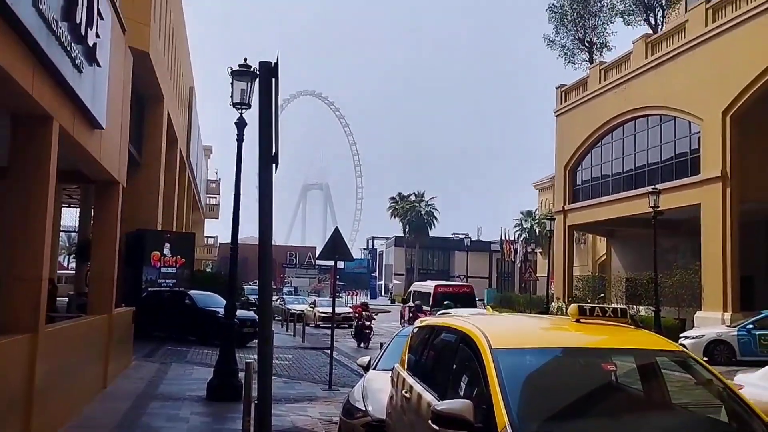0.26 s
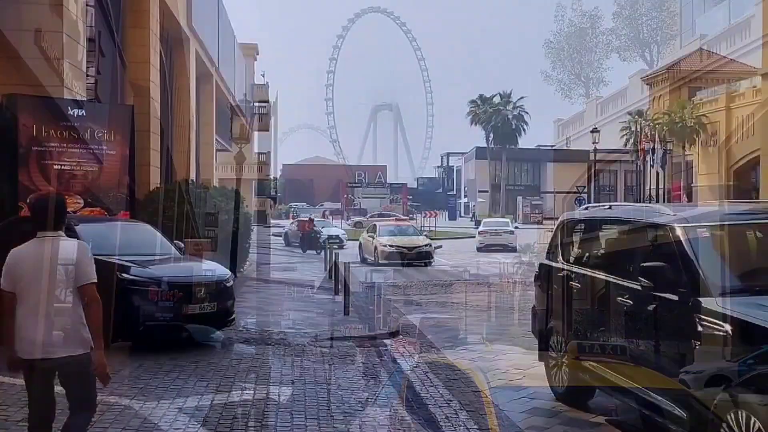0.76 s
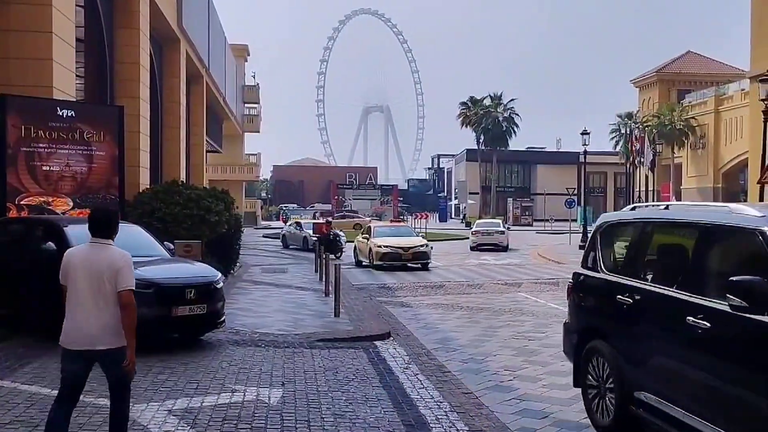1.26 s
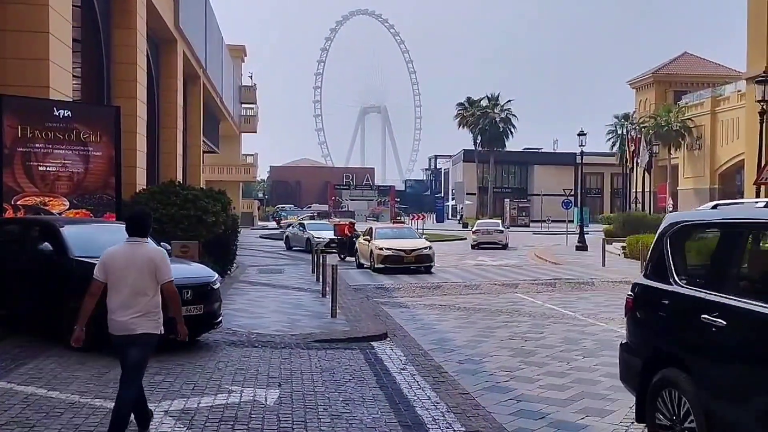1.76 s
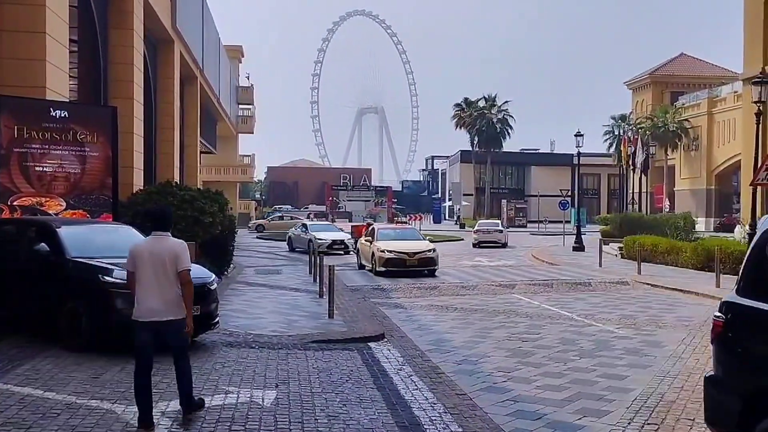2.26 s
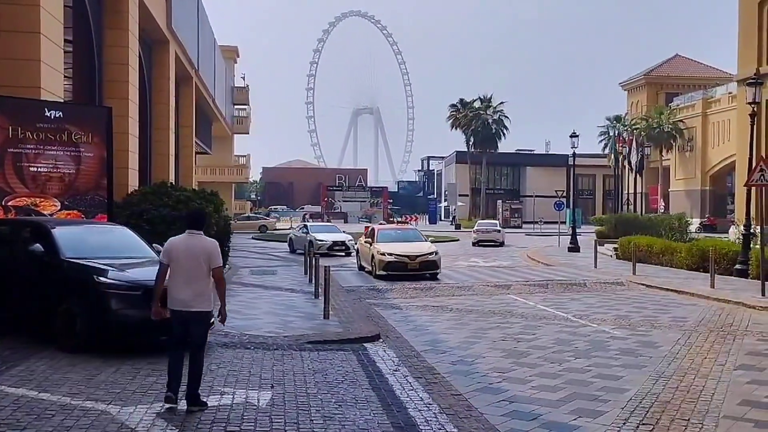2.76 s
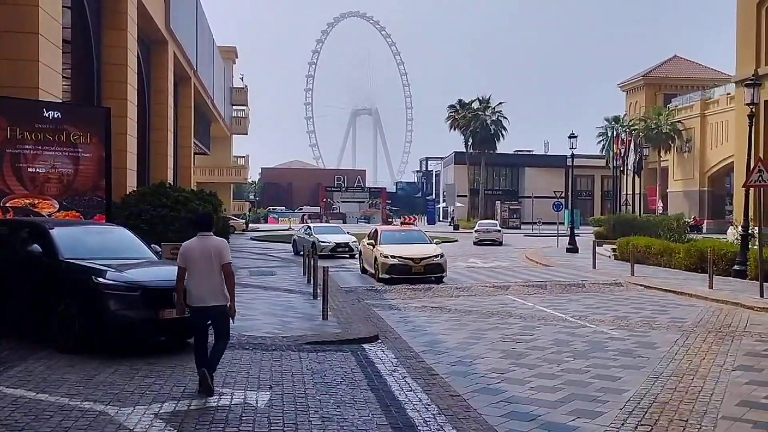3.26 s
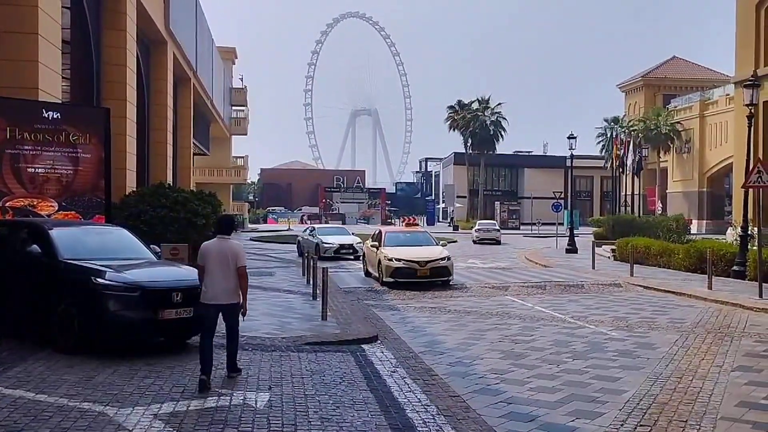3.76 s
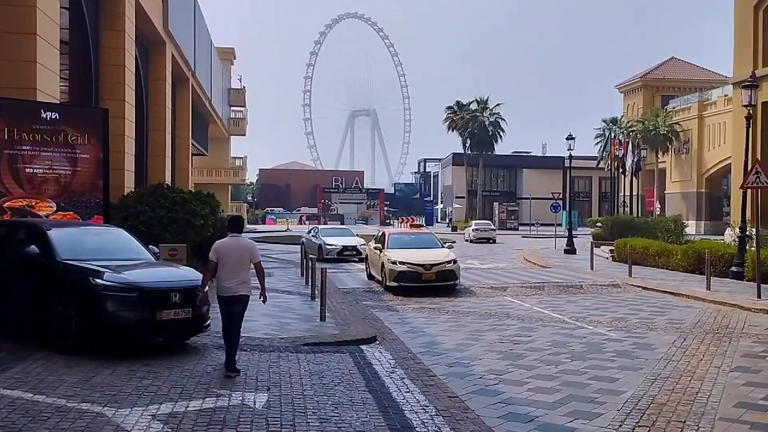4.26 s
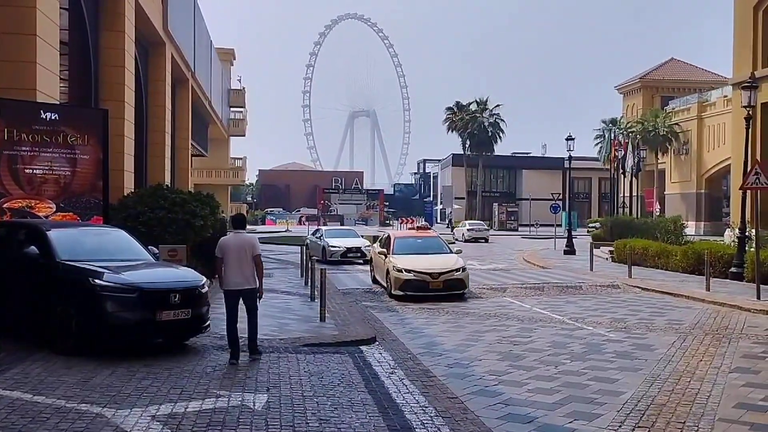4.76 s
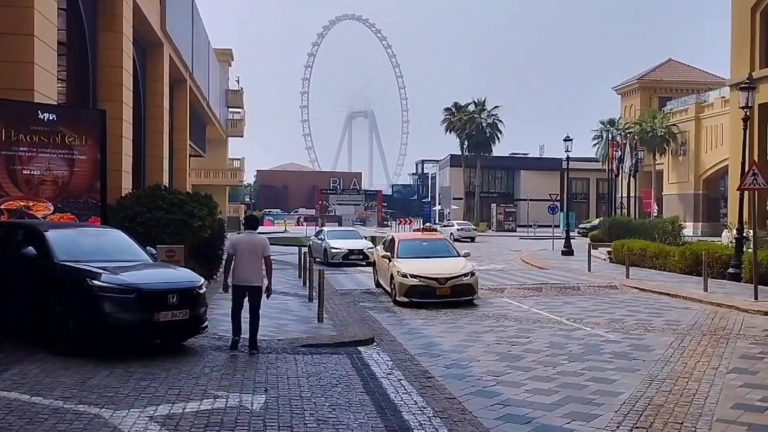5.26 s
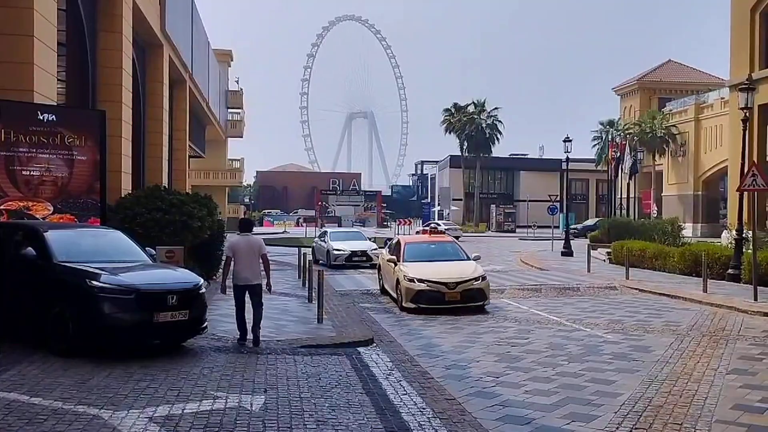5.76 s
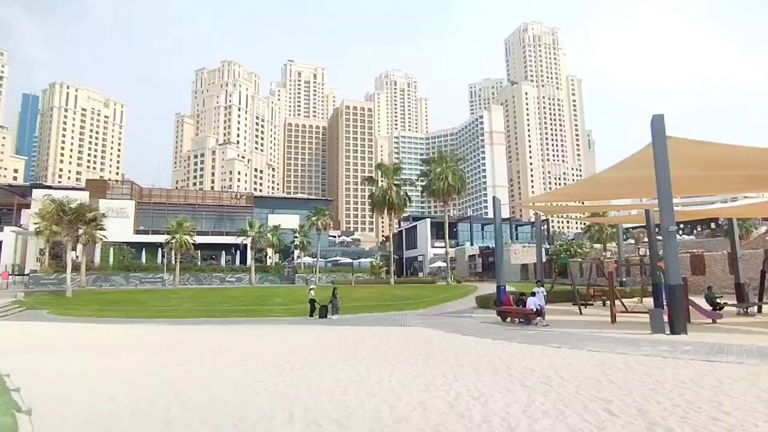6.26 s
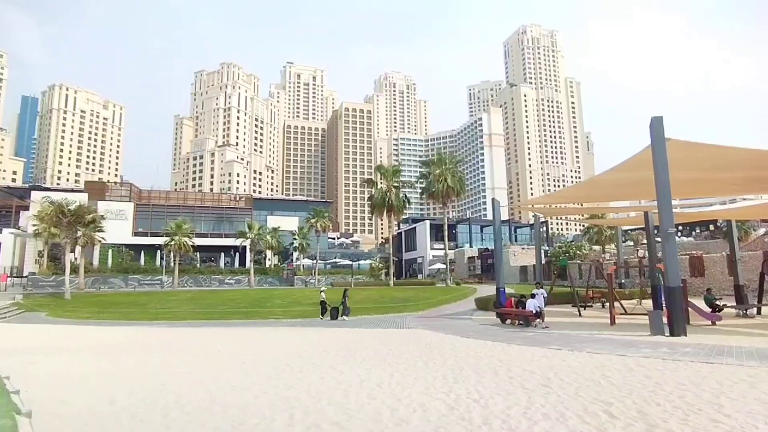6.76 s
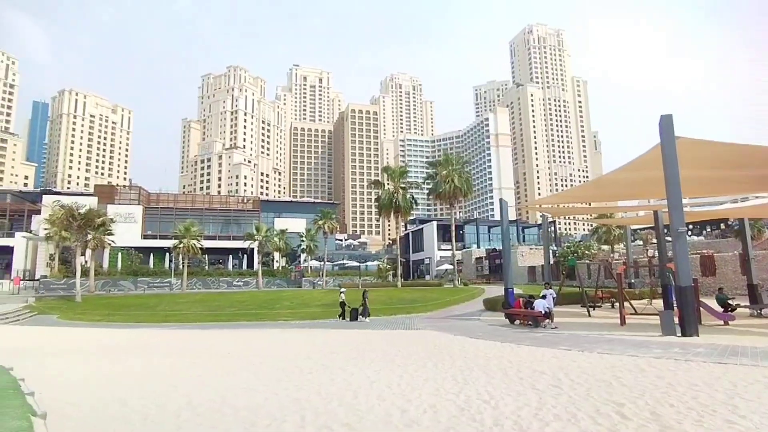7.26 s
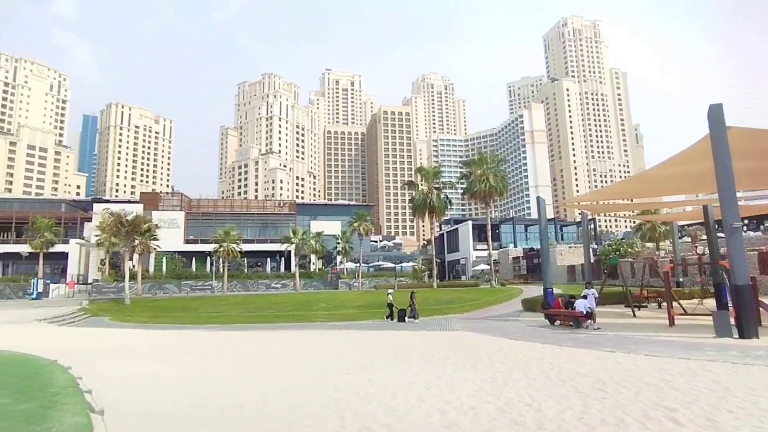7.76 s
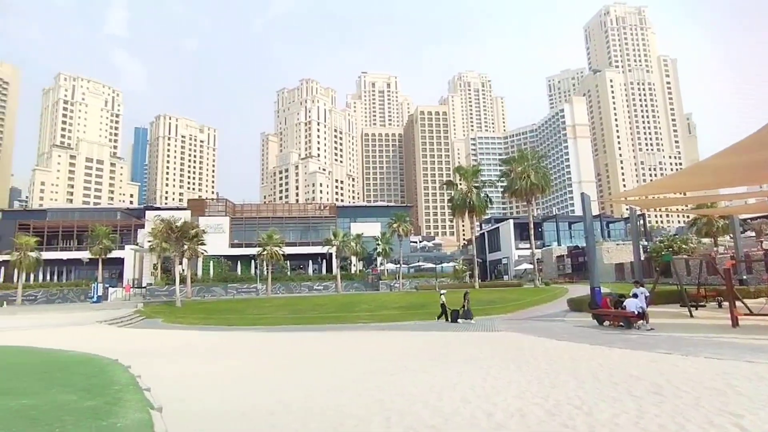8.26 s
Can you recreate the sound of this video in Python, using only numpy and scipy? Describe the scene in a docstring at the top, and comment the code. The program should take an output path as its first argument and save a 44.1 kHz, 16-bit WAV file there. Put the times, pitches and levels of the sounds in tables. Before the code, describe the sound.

Cars roll slowly along a paved street, engines humming and throbbing while tyres hiss. Sparrows chirp now and then, and a rubbing brake gives short, high squeals. The street stops dead, and after a blink of silence a quieter beach swells in: distant traffic, humming machinery, a breeze, tiny crackles of sand and a faint high trill. Puffs of wind bump the stereo microphones in both places.

```python
"""Cobbled street, then beach front

Slow traffic: engines hum and throb, tyres hiss on the paving, a rubbing brake disc sings, sparrows chirp.
After a short silence, a quieter beach: far traffic, humming machinery, a breeze, crackling sand and a
thin high trill. Wind puffs strike the two microphones, a hand's length apart, in both places.
Road, wind and sand are shaped noise; machines and birds are wavering sines."""
import sys
import numpy as np
from scipy import signal
from scipy.fft import rfft, irfft, next_fast_len
from scipy.io import wavfile
from scipy.ndimage import uniform_filter1d, map_coordinates

SR = 44100
rng = np.random.default_rng(int(sys.argv[2]) if len(sys.argv) > 2 else 0)


def generate_wav(signal):
    """Clip the signal to [-1, 1] and save it as 16-bit WAV at the path in sys.argv[1]."""
    frames = np.transpose(np.atleast_2d(signal))
    scaled = np.clip(frames, -1, 1) * 32767
    pcm = np.round(scaled).astype(np.int16)
    wavfile.write(sys.argv[1], SR, pcm)


N = 375732
STREET_END_S, BEACH_START_S = 6.094, 6.234

# Stereo lean by band. Each row: frequency in Hz, left minus right in dB.
STREET_PAN = [(60, -1.5), (400, 0), (800, -.5), (1400, 1.5), (2000, 0), (2600, -6), (4000, -7),
              (5200, -3.5), (6500, 0), (8000, 0.5), (9500, 10), (11000, 12.5), (13000, 8.5), (16000, 5.5)]
BEACH_PAN = [(100, -0.5), (400, 2.5), (1300, -4), (2400, -4), (4400, -8.5), (6500, -8), (8200, 2),
             (10000, 2), (12500, 12.5), (16000, 2)]
CRUNCH_PAN = [(1000, -1), (4500, -2)]
# Spectrum of crunching sand. Each row: frequency in Hz, relative density in dB.
CRUNCH_SPECTRUM = [(700, -26), (1500, -4), (2500, 1), (3600, -6), (4600, -13), (6500, -47)]


def amp(db):
    """Decibels to gain."""
    return 10 ** (np.asarray(db) / 20)


def unit(x):
    """x at rms 1."""
    return x / np.sqrt(np.mean(x ** 2) + 1e-20)


def clock():
    """Sample times in seconds."""
    return np.arange(N) / SR


def spell(start_s, end_s, attack_s, release_s):
    """Envelope, 0 to 1: rises before the start, holds, falls after the end."""
    t = clock()
    return np.clip(1 + np.minimum((t - start_s) / attack_s, (end_s - t) / release_s), 0, 1)


def along(points, hz):
    """Interpolate (Hz, value) points on a log frequency axis."""
    knots_hz, values = np.transpose(points)
    return np.interp(np.log(hz + 1), np.log(knots_hz + 1), values)


def wobble(rate_hz):
    """Smooth random curve, rate_hz knots a second."""
    knots = rng.standard_normal(int(N * rate_hz / SR) + 4)
    return map_coordinates(knots, [clock() * rate_hz])


def filtered(x, response):
    """Filter x by response(hz)."""
    size = next_fast_len(N + 8192)
    return irfft(rfft(x, size) * response(np.fft.rfftfreq(size, 1 / SR)), size)[..., :N]


def sides(pan_db):
    """Stereo gains for a left minus right level."""
    return amp(np.array([[.5], [-.5]]) * pan_db)


def placed(pair, spectrum, pan):
    """Colour and pan a stereo pair by band; its centre has rms 1."""
    out = filtered(pair, lambda hz: amp(along(spectrum, hz)) * sides(along(pan, hz)))
    return out / np.std(out.mean(0))


def rush(spectrum, pan, alike, patchy_db=1.0):
    """Diffuse noise at two spaced microphones, patchy in time and frequency."""
    # The pair agrees in the bass and opposes where half a wave fits between.
    # Each row: frequency in Hz, correlation.
    coherence = [(60, 1), (300, 0.96), (520, 0.72), (750, 0.8), (1000, 0.41), (1200, 0.11), (1450, -0.52),
                 (1850, -0.54), (2150, 0.02), (2800, -0.046), (3200, -0.11), (4000, 0.018), (16000, 0.1)]

    def mid_side_gains(hz):
        likeness = np.clip(alike * along(coherence, hz), -1, 1)
        return np.sqrt([1 + likeness, 1 - likeness])

    bins = signal.stft(rng.standard_normal((2, N)), nperseg=512)[2]
    patches = uniform_filter1d(rng.standard_normal(bins.shape[1:]), size=7, axis=0)
    patches = unit(uniform_filter1d(patches, size=16, axis=1))
    pair = signal.istft(bins * amp(patchy_db * patches), nperseg=512)[1][:, :N]
    mid, side = filtered(pair, mid_side_gains)
    return placed(np.array([mid + side, mid - side]), spectrum, pan)


def from_right(spectrum, lag_s=.00035):
    """Direct road noise: reaches the left microphone lag_s late."""
    delay_s = lag_s * np.array([[.5], [-.5]])
    pair = filtered(rng.standard_normal(N), lambda hz: np.exp(-2j * np.pi * hz * delay_s))
    return placed(pair, spectrum, STREET_PAN)


def tone(hz, drift, rate_hz, flutter_db):
    """Sine of rms 1 wavering in level and pitch; drift is a fraction of the pitch."""
    phase = 2 * np.pi * np.cumsum(hz * (1 + drift * wobble(rate_hz))) / SR
    return unit(np.sin(phase + rng.uniform(0, 2 * np.pi)) * amp(flutter_db * wobble(rate_hz)))


def draught():
    """Air moving down the street buffets the microphones."""
    # Each row: frequency in Hz, relative density in dB.
    spectrum = [(8, -22), (22, 3), (45, 4.5), (65, -8.5), (120, -13.5), (300, -50.5), (600, -100)]
    level_db = -32.5 + spell(3.4, 4.7, .4, .5) + 1.3 * wobble(12)
    return amp(level_db) * rush(spectrum, STREET_PAN, alike=.62)


def traffic(leftward_db_per_s=.9):
    """Cars roll past: engines rumble, the road roars, tyres hiss and drum on the paving."""
    # Each row: frequency in Hz, relative density in dB.
    rumble_spectrum = [(35, -14.5), (65, -2), (100, 0.5), (130, -2.5), (180, -4), (300, -6.5), (400, -13.5),
                       (600, -28), (1500, -85)]
    roar_spectrum = [(150, -36), (330, -5.5), (450, -0.5), (620, -5), (800, -4), (1000, -7.5), (1300, -11),
                     (1700, -11.5), (2400, -30.5), (6000, -78)]
    tyre_spectrum = [(900, -28), (1600, -2.5), (1900, 0), (2200, 0.5), (2700, -1), (3000, -2.5), (3600, -3),
                     (4500, -6.5), (5700, -11.5), (6500, -24), (7400, -34), (8100, -29), (10000, -52)]
    paving_spectrum = [(250, -29), (420, -16), (530, 4.5), (720, 0.5), (880, -2.5), (1100, -14),
                       (2000, -40)]
    fizz_spectrum = [(3500, -14), (5500, 5.5), (6400, 4), (7500, 1), (8150, -19.5), (8800, -5),
                     (9900, -4.5), (11100, -9.5), (12400, 0.5), (14000, -2), (16000, -3.5)]
    near_spectrum = [(600, -30), (1500, -9), (2000, 1), (2600, 2.5), (3300, -3.5), (4200, -6.5),
                     (5300, -16), (6600, -13), (8000, -27.5), (10000, -22), (11200, -37), (12500, -17),
                     (16000, -18)]
    # Each row: frequency in Hz, left minus right in dB.
    near_pan = [(1000, -8), (3000, -2.5), (6000, -20), (12500, -1)]
    rolling = spell(2.12, 4.1, 1.6, 1.24)
    near = spell(0, .21, .1, .66)  # a car creeps by on the right
    approach = spell(4.54, 5.4, .6, 1.0)  # another comes up the street
    rumble = amp(-27.5 + 1.47 * rolling + 2 * near) * rush(rumble_spectrum, STREET_PAN, alike=.96)
    roar_db = -36.5 + 2 * rolling + 1.5 * near
    roar = amp(roar_db) * rush(roar_spectrum, STREET_PAN, alike=.86, patchy_db=.73)
    tyre_echoes = rush(tyre_spectrum, STREET_PAN, alike=.96, patchy_db=.9)
    tyres = amp(-46.5 + 2.5 * rolling) * (tyre_echoes + amp(-6.5) * from_right(tyre_spectrum))
    paving = amp(-42.5) * approach * rush(paving_spectrum, STREET_PAN, alike=.9)
    leftward = sides(leftward_db_per_s * (clock() - STREET_END_S / 2))
    fizz = amp(-58.5 + 8.5 * rolling) * leftward * rush(fizz_spectrum, STREET_PAN, alike=.5)
    near_hiss = amp(-41.5) * near * rush(near_spectrum, near_pan, alike=.8, patchy_db=1.1)
    return rumble + roar + paving + tyres + fizz + near_hiss


def motors():
    """One engine idles, one pulls and slows, a heavy exhaust throbs; a near car and a cooling fan hum."""
    # Each row: time in seconds, firing rate in Hz, level in dB.
    pulling = [(0, 148, -47), (.6, 150, -39), (1.0, 152, -33.5), (1.55, 155.5, -32.5), (1.95, 155, -41),
               (2.35, 154, -32.5), (3.2, 150, -31), (3.9, 146.5, -34.5), (4.4, 145, -44), (4.95, 144, -34),
               (5.2, 143, -44.5), (5.5, 143, -35), (6.1, 142, -42.5)]
    throb = [(1.7, 41.8, -60), (2.2, 42.4, -30), (2.8, 43.1, -32.5), (3.3, 45, -35.5), (3.9, 41.95, -35),
             (4.2, 36.34, -33), (4.45, 34.8, -28), (4.8, 35, -55)]
    # Each row: time in seconds, level in dB.
    fan_levels = [(0, -50), (.65, -46), (.9, -42), (1.4, -36), (2, -38), (2.2, -41), (2.9, -37.5),
                  (3.4, -40), (3.6, -34.5), (4.25, -38), (4.6, -47), (5.3, -47), (6, -43)]
    # Weaker tones of idling cars. Each row: frequency in Hz, relative level in dB.
    overtones = [(226, -6.5), (270, -4), (303, -2.5), (347, -2), (458, -17.5), (506, -9.5), (541, -9),
                 (617, -11), (652, -11.5), (740, -10)]
    t = clock()
    idle_db = -40 + 9 * spell(2.4, 3.8, 1.9, 5.2)
    engines = amp(idle_db) * tone(69.5, drift=.02, rate_hz=9, flutter_db=1)
    for course in (pulling, throb):
        times_s, hz, db = np.transpose(course)
        firing = tone(np.interp(t, times_s, hz), drift=.0161, rate_hz=16, flutter_db=1.5)
        engines += amp(np.interp(t, times_s, db)) * firing
    near_hum = amp(-39) * spell(.051, .87, .1, .34) * tone(269, drift=.002, rate_hz=7, flutter_db=2.5)
    fan_db = np.interp(t, *np.transpose(fan_levels))
    fan = amp(fan_db) * tone(370, drift=.0025, rate_hz=9, flutter_db=1)
    load = spell(1.45, 4.27, .56, .4)
    weak_tones = sum(amp(db) * tone(hz, drift=.003, rate_hz=7, flutter_db=3.5) for hz, db in overtones)
    return (engines + near_hum + fan + amp(-46 + 5.5 * load) * weak_tones) * sides(-.5)


def gusts():
    """Brief puffs of wind, each stronger at one microphone."""
    # Each row: peak time in seconds, level in dB, left minus right in dB, half-length in seconds.
    puffs = [(0.166, -26.5, 13, 0.1), (0.42, -22.5, 2, 0.053), (0.555, -27, 13, 0.05),
             (0.774, -29, 22, 0.026), (6.397, -30, -10, 0.023), (6.47, -31, -11, .022),
             (6.82, -33, -10, 0.024), (6.936, -31, -14, 0.03), (7.043, -28.5, -12, 0.03),
             (7.112, -29, -9, 0.031), (7.19, -23.5, -4, 0.03), (7.374, -28, -19, 0.021),
             (7.439, -30, -11, 0.021), (7.695, -32.5, -5, 0.02), (8.04, -31, 1, .022), (8.46, -38, 4, .022)]
    # Each row: frequency in Hz, relative density in dB.
    spectrum = [(8, -9), (20, 5), (60, 3.5), (110, -4.5), (200, -13), (320, -24.5), (600, -45), (1200, -87)]
    force = sum(amp(db) * sides(pan_db) * np.exp(-((clock() - peak_s) / half_s) ** 2)
                for peak_s, db, pan_db, half_s in puffs)
    return force * rush(spectrum, [(100, .004)], alike=.42, patchy_db=1.5)


def brake(catch_hz=15, grip_db=1.8):
    """A rubbing disc sings, swelling at each catch; echoes make each microphone flutter differently."""
    # Each row: start in seconds, end in seconds, level in dB, pitch in Hz.
    squeals = [(.42, .46, -51, 2700), (.775, .8, -47, 2810), (1.3, 1.42, -53, 2790), (2.42, 2.5, -55, 2815),
               (4.21, 4.33, -50.5, 2805), (4.4, 4.57, -47, 2810), (4.67, 4.8, -50, 2790),
               (4.88, 5.06, -49.5, 2790), (5.165, 5.282, -45, 2806), (5.368, 5.86, -55, 2790)]
    out = np.zeros((2, N))
    for start_s, end_s, db, hz in squeals:
        pitch_hz = hz * (1 + .003 * wobble(9))
        song = np.array([tone(pitch_hz, drift=.00903, rate_hz=170, flutter_db=2.5) for _ in range(2)])
        out += amp(db) * spell(start_s, end_s, .035, .05) * song
    grip = unit(amp(grip_db * tone(catch_hz, drift=.2, rate_hz=12, flutter_db=-2)))
    return out * grip * sides(-7)


def sparrows(arch=.008):
    """Short raspy whistles, rising and falling slightly in pitch."""
    # Each row: centre in seconds, level in dB, pitch in Hz, half-length in seconds, rasp as pitch share.
    chirps = [(1.37, -46, 5230, .039, 0.014), (3.375, -46, 4380, .04, .011),
              (4.008, -42.5, 4715, .036, 0.0076), (4.115, -49, 5270, .035, .008),
              (4.885, -50, 5200, .037, .01), (5.41, -53, 5220, .04, .01), (7.125, -63.5, 5180, .026, .007),
              (8.12, -65, 4200, .026, 0.0068)]
    out = np.zeros(N)
    grain = wobble(500)
    for centre_s, db, hz, half_s, rasp in chirps:
        offset = np.clip((clock() - centre_s) / half_s, -1, 1)
        pitch_hz = hz * (1 - arch * offset ** 2 + rasp * grain)
        out += amp(db) * (1 - offset ** 2) ** 2 * np.sin(2 * np.pi * np.cumsum(pitch_hz) / SR)
    return out * sides(-2)


def far_traffic(rise_db_per_s=1.0):
    """Traffic heard from the beach: a low drone and a murmur that slowly nears."""
    # Each row: frequency in Hz, relative density in dB.
    drone_spectrum = [(30, -5), (60, 3.5), (115, 0.5), (170, -4.5), (260, -8), (340, -13.5), (450, -28),
                      (900, -68)]
    murmur_spectrum = [(120, -22), (300, -2.5), (450, 2.5), (720, -2), (1000, -8.5), (1600, -11.5),
                       (2300, -16), (3200, -22), (4500, -27.5), (7000, -36.5), (12000, -70)]
    drone = amp(-36.5) * rush(drone_spectrum, BEACH_PAN, alike=1, patchy_db=0)
    murmur_db = -50.5 + rise_db_per_s * (clock() - BEACH_START_S)
    return drone + amp(murmur_db) * rush(murmur_spectrum, BEACH_PAN, alike=.8, patchy_db=1.4)


def machinery(fade_s=.45):
    """Machines hum in the buildings behind the beach, fading in."""
    # Each row: frequency in Hz, relative level in dB.
    partials = [(116, 4), (232, 3), (295, -1.5), (375, -5), (440, -13), (750, -13.5), (1315, -16.5),
                (1859, -26), (2095, -21)]
    hum = sum(amp(db) * tone(hz, drift=.00403, rate_hz=24, flutter_db=3.5) for hz, db in partials)
    return amp(-53.5) * hum * spell(BEACH_START_S + fade_s, N / SR, fade_s, .03) * sides(-2.7)


def sand():
    """A thin, restless sandy hiss and one soft rustle."""
    # Each row: frequency in Hz, relative density in dB.
    hiss_spectrum = [(2500, -34), (4700, -4), (5600, -2), (6300, -4.5), (7100, -14), (8200, -26),
                     (10000, -13.5), (11200, -21), (12200, -13), (14500, -14), (16000, -14)]
    hiss_db = -71 + 2.3 * wobble(60) + 1.3 * wobble(13)
    hiss = amp(hiss_db) * rush(hiss_spectrum, BEACH_PAN, alike=.5, patchy_db=2)
    rustle_gain = amp(-67 + 2.2 * wobble(35)) * spell(7.1, 7.55, .5, .15)
    return hiss + rustle_gain * rush(CRUNCH_SPECTRUM, CRUNCH_PAN, alike=.5, patchy_db=4)


def breeze(fall_db_per_s=2.5):
    """A dying breeze buffets the microphones, mostly the right one."""
    # Each row: frequency in Hz, relative density in dB.
    spectrum = [(8, -17), (20, 0.5), (60, 0.5), (90, -5.5), (130, -10), (220, -21.5), (330, -23),
                (600, -66), (1000, -100)]
    level_db = -33.5 - fall_db_per_s * np.maximum(clock() - BEACH_START_S, 0) + 1.6 * wobble(25)
    return amp(level_db) * sides(-3) * rush(spectrum, [(100, 0)], alike=.79)


def crackles(t60_s=.023, rise_s=.0016, faint_count=150):
    """Grit gives way in tiny bursts of low crunch, ring and high spark: some clear, many faint."""
    # Each row: start in seconds, then crunch, ring and spark levels in dB.
    clear = [(6.3272, -62, -62, -71.5), (6.3561, -63, -56, -61), (6.383, -60, -77, -69.5),
             (6.4045, -54.5, -61, -65), (6.4379, -58, -51.5, -58), (6.4923, -53, -57, -62),
             (6.5277, -64, -55, -63), (6.5806, -54, -60, -64), (6.6669, -63, -58, -66),
             (6.6993, -57, -52, -59), (6.7602, -65, -71, -70.5), (6.7896, -61, -62, -62.5),
             (6.843, -61, -57, -64.5), (6.8689, -65, -75, -69.5), (6.8854, -65, -59, -64.5),
             (7.0899, -58, -64, -68.5), (7.262, -59, -62, -63.5), (7.3967, -65, -57, -67.5),
             (7.4521, -64, -63, -80.5), (7.461, -64, -62, -75.5), (7.556, -53, -65, -64),
             (7.5818, -64, -53, -62.5), (7.6292, -62, -72, -76.5), (7.6536, -53, -59, -71.5),
             (7.6801, -64, -65, -59.5), (7.721, -54, -68, -73.5), (7.7479, -64, -51, -58.5),
             (7.7709, -63, -60, -71.5), (7.8715, -64, -63, -63), (7.94, -59, -63, -74.5),
             (8.1375, -60, -69, -79.5), (8.17, -62, -62, -67.5), (8.2303, -57, -66, -72),
             (8.2662, -65, -64, -78.5), (8.3196, -55, -66, -65), (8.3575, -65, -57, -63.5),
             (8.4114, -64, -67, -78.5), (8.4753, -64, -63, -78.5), (8.5027, -64, -69, -71.5)]
    # Faint bursts: crunch, ring and spark offsets in dB.
    faint_mix_db = (0.5, -1, -6)
    # Each row: frequency in Hz, relative density in dB.
    ring_spectrum = [(3500, -28), (4700, -9), (5500, -2), (6150, 1.5), (6700, -9), (7600, -19), (9000, -50)]
    spark_spectrum = [(6000, -28), (8200, -6), (10000, -3), (11200, -7), (12300, -2), (14000, -1),
                      (16000, -1)]
    when, size = rng.random((faint_count, 2)).T
    size_db = -70 - 2.4 * np.log(1 - .95 * size)
    faint_db = size_db[:, None] + faint_mix_db + 3 * rng.standard_normal((faint_count, 3))
    faint = np.column_stack([BEACH_START_S + when * (N / SR - BEACH_START_S), faint_db])
    t = np.arange(SR // 10) / SR
    burst = (1 - np.exp(-t / rise_s)) * amp(-60 * t / t60_s)
    burst /= burst.max()
    powers = np.zeros((3, N + SR))
    for start_s, *db in list(clear) + list(faint):
        first = round(start_s * SR)
        powers[:, first:first + len(t)] += (amp(db)[:, None] * burst) ** 2
    grain = unit(amp(2.4 * wobble(900)))
    bands = (CRUNCH_SPECTRUM, CRUNCH_PAN), (ring_spectrum, BEACH_PAN), (spark_spectrum, BEACH_PAN)
    return grain * sum(np.sqrt(power[:N]) * rush(spectrum, pan, alike=.5)
                       for power, (spectrum, pan) in zip(powers, bands))


def trill(pulse_hz=31, depth_db=5.5, fade_s=.056):
    """Thin pulsing chatter, like small far birds; the pitch shifts from pulse to pulse."""
    # Each row: start in seconds, end in seconds, level in dB, pitch in Hz.
    phrases = [(7.66, 7.976, -69.5, 5480), (8.25, 8.52, -64.5, 5700)]
    pulsing = unit(amp(depth_db * tone(pulse_hz, drift=.193, rate_hz=15, flutter_db=1.5)))
    out = np.zeros((2, N))
    for start_s, end_s, db, hz in phrases:
        pitch_hz = hz * (1 + .012 * wobble(pulse_hz))
        song = np.array([tone(pitch_hz, drift=.028, rate_hz=550, flutter_db=4) for _ in range(2)])
        out += amp(db) * spell(start_s, end_s, fade_s, fade_s) * song
    return out * pulsing * sides(-9.5)


def scene(swell_s=.18, swell_db=8.5):
    """The street stops dead; after a moment of silence the beach swells in."""
    t = clock()
    in_street = np.clip((STREET_END_S - t) / .0031, 0, 1)
    dip_db = swell_db * np.clip(1 - (t - BEACH_START_S) / swell_s, 0, 1)
    at_beach = spell(BEACH_START_S, N / SR, .034, .03) ** 2 * amp(-dip_db)
    street = draught() + traffic() + motors() + brake()
    beach = far_traffic() + machinery() + sand() + breeze() + trill()
    return in_street * street + at_beach * beach + crackles() + gusts() + sparrows()


def record(dry):
    """Brick-wall low-pass."""
    return filtered(dry, lambda hz: hz < 15800)


dry = scene()
out = record(dry)
generate_wav(out)
```